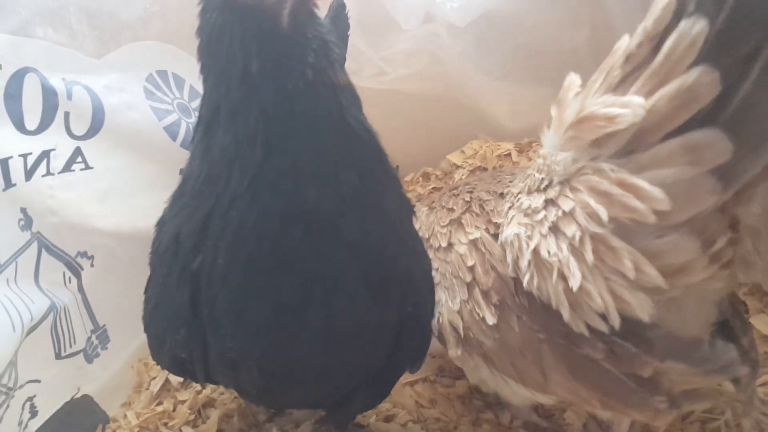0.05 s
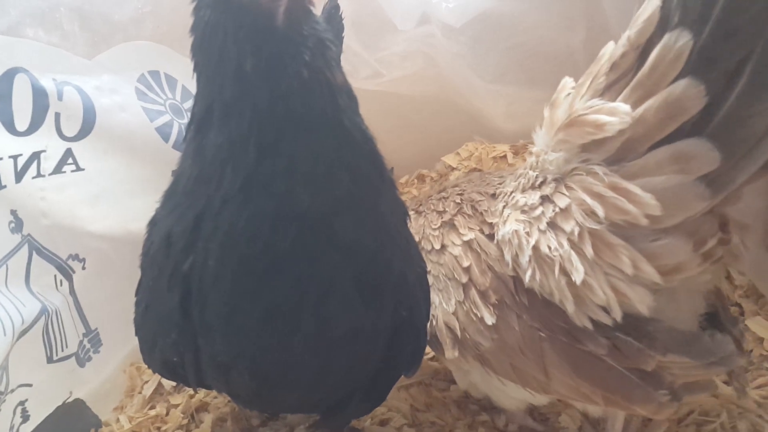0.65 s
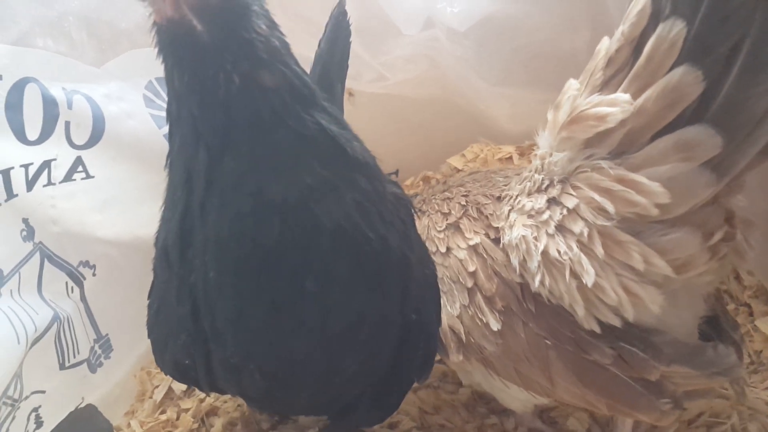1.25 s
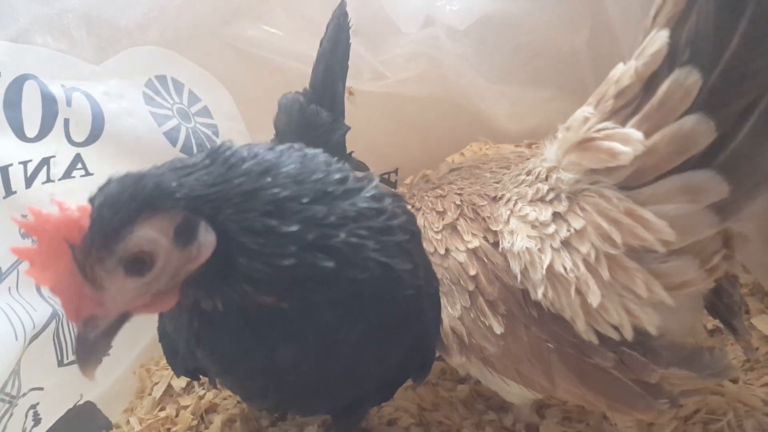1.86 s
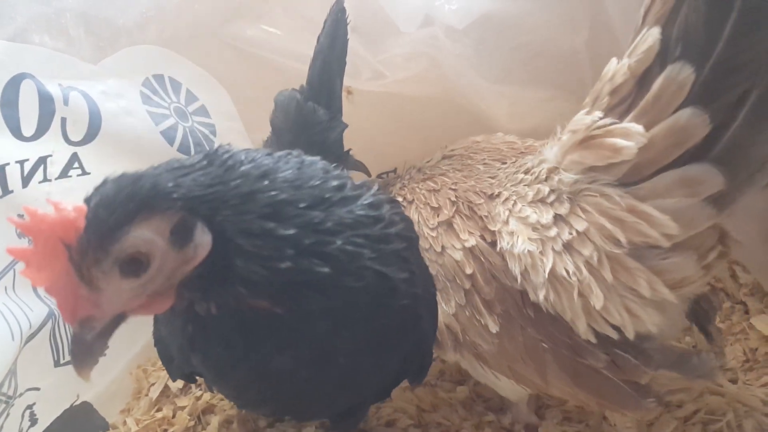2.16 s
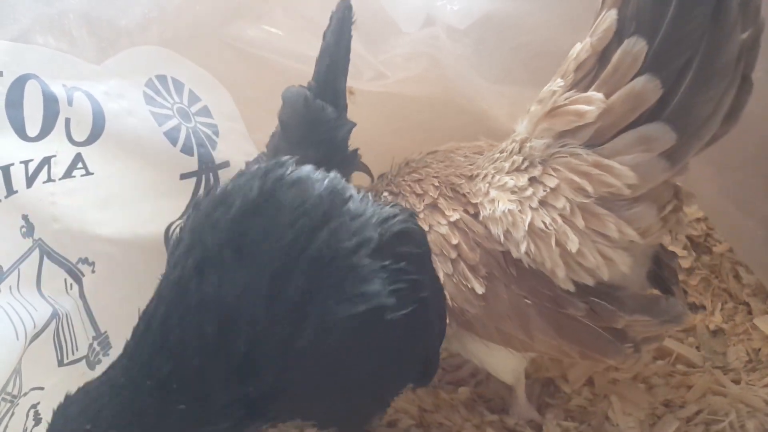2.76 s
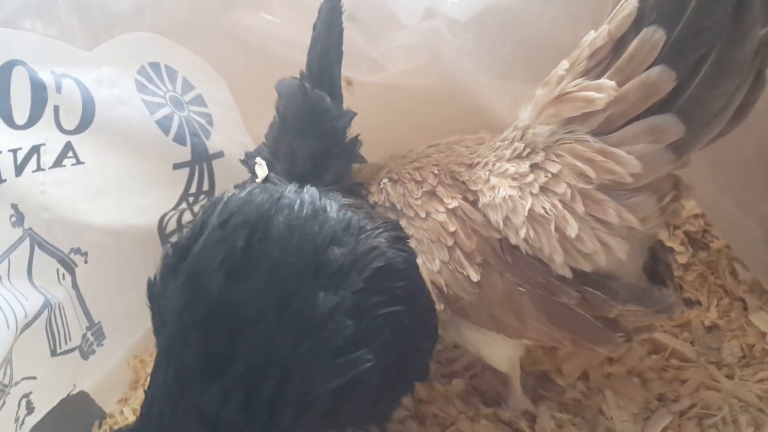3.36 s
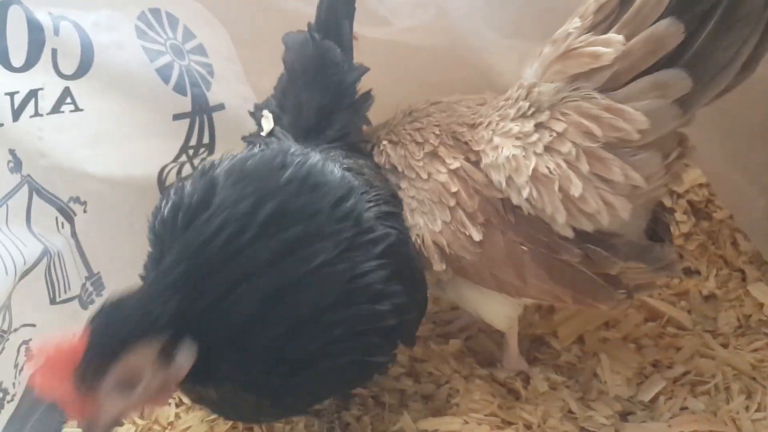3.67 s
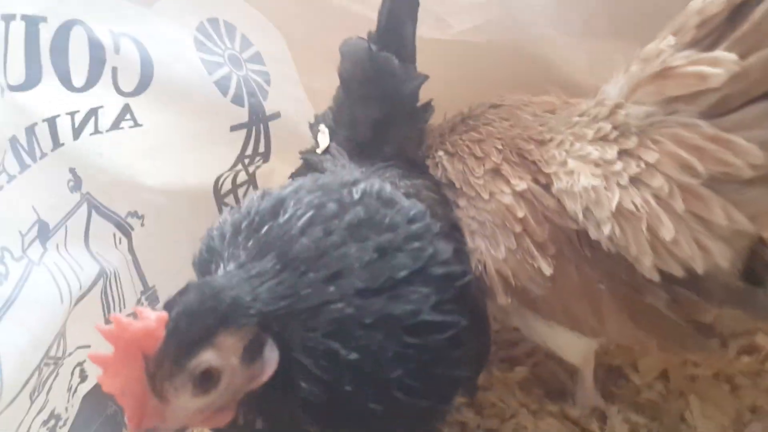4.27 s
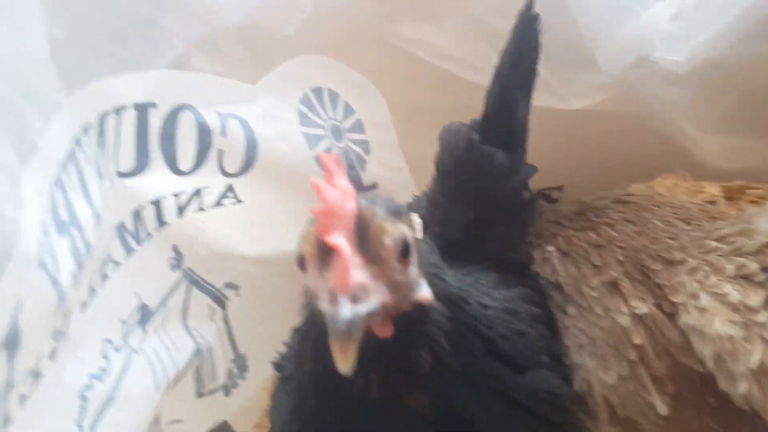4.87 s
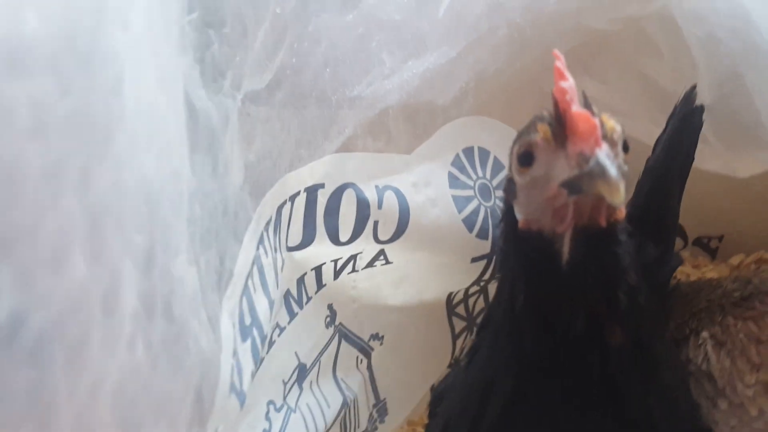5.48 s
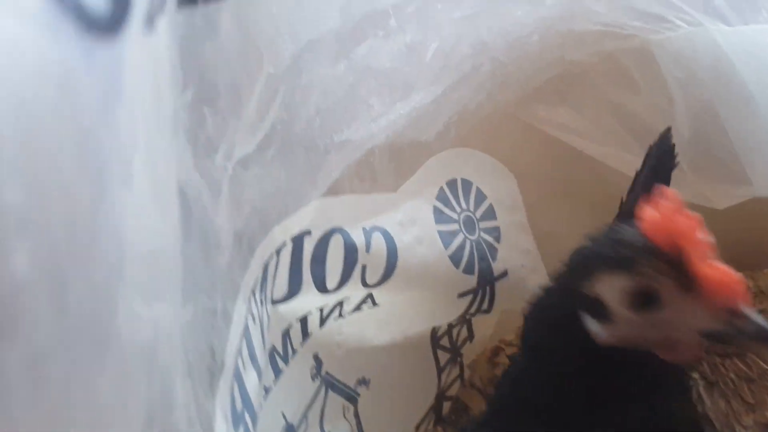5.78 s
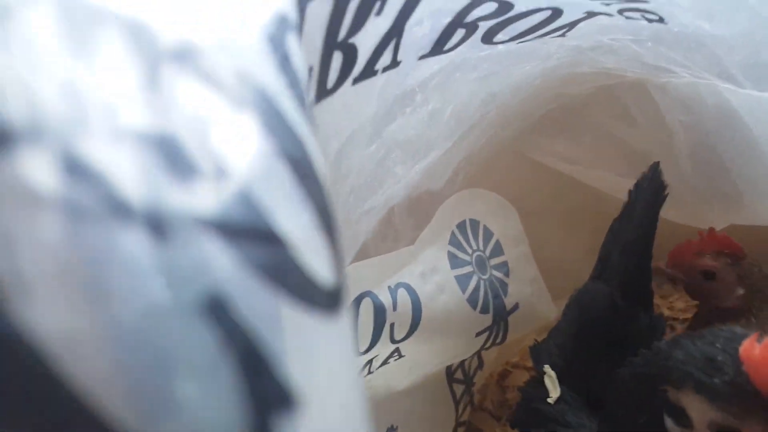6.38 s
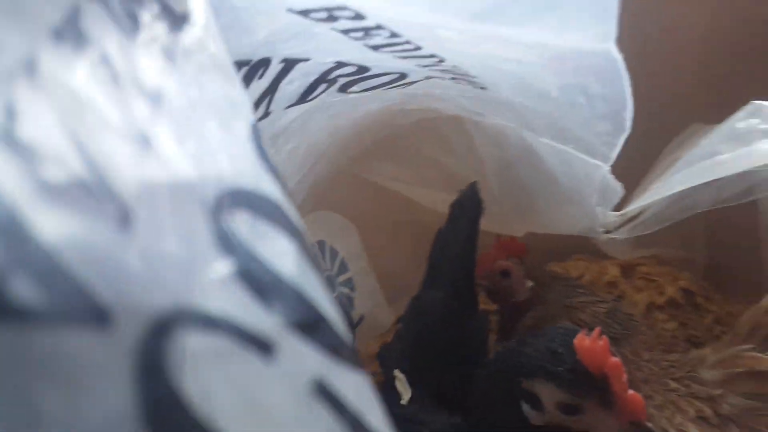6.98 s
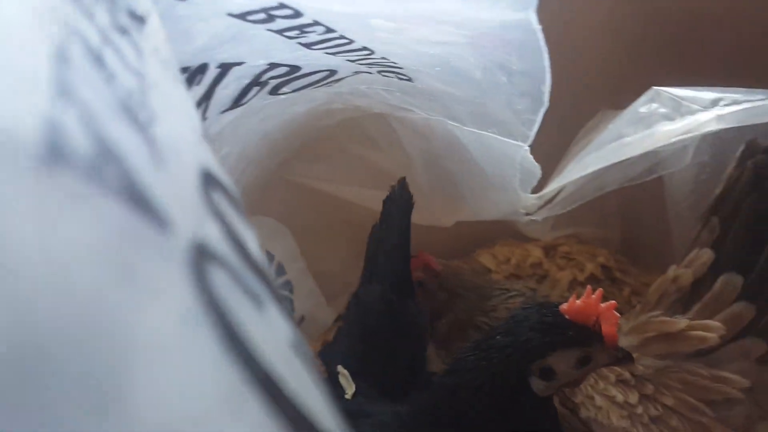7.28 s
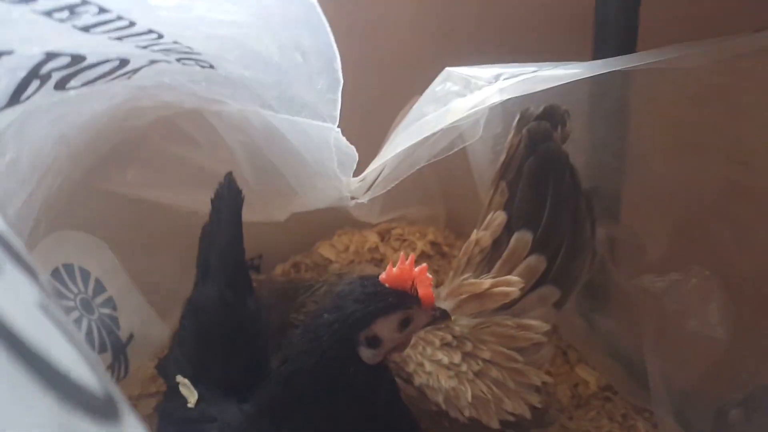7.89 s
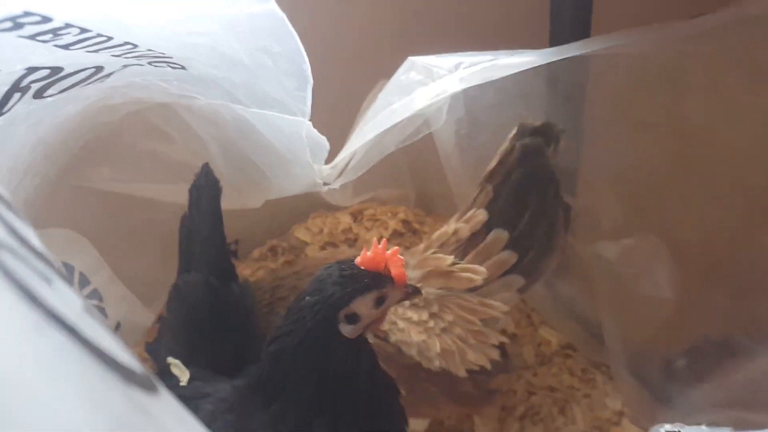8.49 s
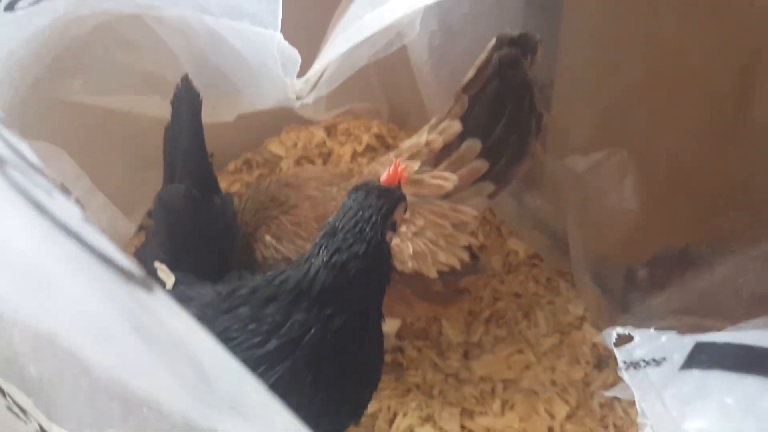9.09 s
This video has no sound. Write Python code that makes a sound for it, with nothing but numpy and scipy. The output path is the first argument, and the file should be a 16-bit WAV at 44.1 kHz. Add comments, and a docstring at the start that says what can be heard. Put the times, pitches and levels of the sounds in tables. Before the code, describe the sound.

For the first 3 seconds, dry wood shavings crackle and tick faintly as two small hens shift their feet. Close by, fingers rub and softly bump the hand-held microphone over a low, steady room hiss. From about 3.2 to 4.3 seconds a finger drags across the device with a low rumble and several dull thumps, strongest near 3.5, while a hen scratches in the shavings. Scattered steps and bumps follow, with one crisp snap of a shaving near 4.9. From 5.8 seconds a plastic bag slides along the device, crinkling, hissing and knocking, mostly on the left and strongest around 6.9. Short scrapes and ticks follow. Near 7.7 a fold scrapes on the right, falling in pitch, and just after 7.8 the bag's edge snaps twice in quick succession, the loudest sounds. The plastic then settles with a soft rustle, and the hens stir faintly around 8.5 seconds.

```python
"""Two small hens shift in wood shavings in a plastic bag, heard from a hand-held device in a quiet room.
At first the shavings crackle faintly while fingers rub and bump the case (stick-slip friction, impact).
Past 3 s a finger drags across it and a hen scratches. From about 5.8 s the bag slides along the case and
its film scrapes over the left and right microphone ports. Near 7.8 s its edge snaps twice against the
right port and rings in damped modes; last, the bag relaxes and the hens stir again."""
import sys
import numpy as np
from scipy import signal
from scipy.fft import rfft, irfft
from scipy.io import wavfile

SR = 44100
rng = np.random.default_rng(int(sys.argv[2]) if len(sys.argv) > 2 else 0)


def wav_record(signal):
    """Record a signal, one row per channel, as 16-bit PCM in the file named by sys.argv[1]."""
    frames = np.transpose(np.atleast_2d(signal))
    bounded = np.clip(frames, -1, 1)
    # unit amplitude maps onto the largest positive 16-bit level
    quanta = np.round(bounded * 32767).astype(np.int16)
    wavfile.write(sys.argv[1], SR, quanta)


N = 407836
TIME = np.arange(N) / SR

# Levels are relative within each table; pan is the left level minus the right.
# Spectra of the room noise and of the dry flakes: (frequency [Hz], gain [dB])
ROOM_SPECTRUM = [(15, -37), (30, -16), (50, -12), (85, -10.5), (116, -8.5), (165, -13), (310, -17.5),
                 (380, -16), (1030, -27), (2750, -29), (4540, -35.5), (6540, -36.5), (9400, -41.5),
                 (14700, -36), (16000, -38.5)]
FLAKE_SPECTRUM = [(1650, -14.5), (2800, -6.5), (3460, -6.5), (4270, -7), (4980, -7), (6570, -6.5),
                  (7720, -9.5), (9530, -23.5), (13800, -17), (15200, -26), (16000, -14.5)]
# Spectra of friction on the case, low to high: (frequency [Hz], gain [dB])
RUMBLE_SPECTRUM = [(20, -50.5), (40, -4.5), (62, -12), (95, -1), (170, -1), (250, -1), (310, -6.5),
                   (420, -19), (700, -69.5)]
RUB_SPECTRUM = [(120, -23), (230, -9), (320, 1), (420, -5), (560, -2), (720, -10), (900, -12),
                (1300, -28.5), (2200, -64)]
SCUFF_SPECTRUM = [(350, -14), (600, -13), (644, -2.5), (1420, -5), (2290, -7), (3240, -14.5), (3570, -19),
                  (5000, -27.5), (6500, -59), (11000, -120)]
# Spectra of the bag's crinkle, its hiss and its film on a port: (frequency [Hz], gain [dB])
CRINKLE_SPECTRUM = [(290, -18.5), (500, 4.5), (560, -4), (800, -2.5), (1050, -3), (1370, -3.5),
                    (1580, -7.5), (1840, -3.5), (4000, -15), (5200, -47.5), (8800, -120)]
HISS_SPECTRUM = [(1470, -34), (2500, -7.5), (3180, -8), (3920, -10), (4340, -7.5), (4730, -8.5),
                 (6010, -7.5), (6760, -5.5), (9290, -25.5), (15000, -25), (16000, -17)]
FILM_SPECTRUM = [(120,-23.5), (350,-8.5), (550,-6.5), (900,-10), (1250,-3), (1770,-1), (3100,-4.5),
                 (4300,-7.5), (6900,-7.5), (8200,-18), (9630,-27), (12900,-20), (16000,-28)]

# A hen shifts a foot: (start [s], duration [s], level [dB])
HEN_STEPS = [(0.025,0.036,-86), (0.153,0.024,-63), (0.206,0.088,-76), (0.343,0.057,-68), (0.5,.04,-77),
             (.76,.02,-69.5), (0.847,.025,-73), (0.937,0.099,-71.5), (1.174,0.26,-81), (1.437,0.17,-73),
             (1.843,0.035,-68), (2.175,0.36,-73), (2.567,0.34,-77.5), (2.943,0.051,-61), (3.006,0.22,-70),
             (3.495,0.025,-52), (3.544,.015,-56), (4.248,0.028,-59.5), (4.3,0.013,-64.5),
             (4.368,0.074,-72.5), (4.453,.035,-67), (4.613,0.029,-64), (4.685,0.017,-57), (4.72,.025,-66),
             (4.99,0.098,-73.5), (5.254,0.022,-78), (5.366,.06,-75.5), (5.456,0.016,-65.5), (8.28,.04,-87),
             (8.509,0.026,-69), (8.554,0.037,-59.5), (8.615,.11,-71), (9.089,.02,-69.5)]
# A spell of scratching: (time [s], level [dB])
HEN_SCRATCHING = [(3.24,-68), (3.46,-62.5), (3.68,-66), (3.8,-56.5), (4.06,-58.5), (4.15,-65.5), (4.35,-75)]
# Single shavings snap: (time [s], level [dB], resonance [Hz], tilt [dB/octave], pan [dB])
FLAKE_SNAPS = [(0.0282,-59.5,3100,5,6), (0.158,-51,6810,-6,-6), (0.2073,-56,2850,4,2),
               (0.642,-54.5,7240,7.5,0), (0.9564,-63,2940,-3,1), (1.5,-47,6500,15.5,-4),
               (2.172,-52,5500,11.5,1), (1.2315,-60.5,2500,0,3), (1.8246,-52.5,2830,4.5,0),
               (1.8584,-39,6400,14,-8), (1.869,-48,2890,6,2), (1.995,-58,6000,7,-5), (2.184,-60,6000,11,-2),
               (2.579,-55,2780,5.5,-1), (2.671,-49,3200,-5,11), (2.7396,-58.5,5500,4,-1),
               (2.972,-43,6500,13,-6), (2.981,-46,6500,13,-4), (3.386,-54.5,3600,-5,10),
               (3.4016,-44,3590,-7,7), (3.424,-44.5,3600,-5.5,8), (3.4605,-43,3600,-5,7),
               (3.498,-40.5,3690,-4,21), (3.5527,-40,3660,-3,9), (4.352,-49,7400,6,3), (4.433,-58,2930,1,8),
               (4.5527,-51,2870,7.5,3), (4.582,-58,2730,2,6), (4.695,-47.5,2300,-6,-1),
               (4.9038,-32,6400,11.5,2.5), (5.0788,-53,3600,-17,1), (5.2824,-58,6600,5,8),
               (5.4779,-50,3520,-3.5,1), (8.5151,-50,3700,-6,-2), (8.5609,-50,6590,9,-6)]

# The hand at rest: (rumble [dB], rub [dB], scuff [dB])
RESTING_HAND = [-70, -85.5, -79]
# A fingertip creeps: (start [s], duration [s], rumble [dB], rub [dB], scuff [dB], pan [dB])
FINGER_CREEPS = [(0.015,0.1,-65.5,-72,-86,-5), (0.134,.06,-56.5,-60.5,-62,-2), (0.23,0.088,-50,-56,-64.5,1),
                 (0.34,0.058,-46,-48,-58.5,-1.5), (0.502,0.041,-55,-58,-71,-3),
                 (0.612,0.025,-57,-72,-88,-6), (0.712,0.083,-52.5,-61,-70.5,-5),
                 (0.861,.03,-52.5,-56.5,-76,2), (0.949,0.066,-45.5,-52,-64,7),
                 (1.073,0.031,-57.5,-64.5,-76,-5), (1.161,0.062,-56,-63.5,-71.5,4),
                 (1.25,0.09,-60,-68,-72.5,1), (1.333,0.03,-64,-64,-81,-2), (1.446,.05,-67,-66,-73,-4),
                 (1.488,0.016,-51.5,-56.5,-71,7), (1.549,0.11,-63,-69,-79,0),
                 (1.83,0.048,-57.5,-62.5,-68.5,3), (2.165,0.062,-64,-69,-76,1), (2.247,.05,-60,-68,-73,-1),
                 (2.401,0.018,-55.5,-70,-73,-1), (2.504,0.012,-48.5,-59,-80,22),
                 (2.578,0.019,-56.5,-62,-71,-4), (2.668,.05,-56.5,-72,-72,2), (2.853,0.041,-46.5,-52,-69,6),
                 (2.904,0.02,-43.5,-49,-73,21), (2.952,0.048,-49,-58,-59.5,-3),
                 (3.045,0.076,-52.5,-61,-71,-1), (3.144,0.083,-44,-54,-64,9), (3.489,0.027,-49,-47,-46,16),
                 (3.978,0.02,-61,-45.5,-44.5,-19), (4.065,0.015,-57,-39,-54.5,-16),
                 (4.261,.015,-51,-59,-53,10), (4.382,0.062,-60,-73,-72,9), (4.458,0.047,-54,-65,-64,0.5),
                 (4.605,0.047,-51.5,-62.5,-62,3), (4.681,0.02,-45,-59,-61,13), (4.718,0.02,-59,-67,-58,-2),
                 (5.075,0.024,-67,-80,-81,6), (5.264,0.072,-66,-85,-77.5,9), (5.375,0.12,-68,-75,-72,5),
                 (5.544,0.021,-49.5,-61,-72,6), (6.169,0.16,-45,-49,-58,13), (6.834,0.0094,-48,-36,-41,25),
                 (7.225,0.04,-53,-63,-74,24), (7.349,0.048,-59,-66,-70,22)]
# One long drag of a finger: (time [s], rumble [dB], rub [dB], scuff [dB], pan [dB])
FINGER_DRAG = [(3.24,-50,-73,-67,3), (3.3,-49,-46,-57,6.5), (3.45,-38.5,-47.5,-57.5,11.5),
               (3.56,-42.5,-40.5,-52.5,-1), (3.63,-54,-49.5,-60,-4.5), (3.79,-46.5,-46.5,-52.5,-10),
               (3.9,-48.5,-44,-50,-23), (4.0,-55,-48.5,-48.5,-13), (4.08,-61,-55,-66,-11),
               (4.15,-59,-54.5,-60.5,-3.5), (4.28,-61,-73,-56,0), (4.35,-64,-71,-76,0)]
# Soft bumps on the case: (time [s], level [dB], frequency [Hz], rise [s], t60 [s], pan [dB])
CASE_BUMPS = [(0.252,-42.5,185,0.0011,.055,0), (0.399,-35.5,172,.001,0.059,10),
              (.88,-46,159,0.0011,0.077,4), (.981,-45,177,.002,.046,6), (1.506,-39.5,198,.002,0.034,20),
              (1.87,-44,109,0.00087,0.039,2), (2.512,-38.5,211,0.0014,0.029,23),
              (2.667,-43,126,.001,0.068,12), (2.861,-39,226,0.0011,0.032,9),
              (2.907,-27.5,202,0.0014,0.042,15), (2.935,-38,172,.002,0.063,15),
              (3.155,-35,185,0.0023,0.035,10), (3.328,-35.5,182.5,0.0017,0.18,17),
              (3.461,-26,182,0.0014,0.098,17), (3.502,-30,265,0.0017,0.047,14),
              (3.527,-26,242,0.0032,0.043,8), (3.554,-19.5,180,0.0015,0.021,3),
              (4.47,-49,171,0.0044,0.058,12), (4.611,-46.5,221,0.0036,0.12,4.5),
              (4.637,-46,117,.003,.055,5), (4.677,-36.5,95.5,.005,0.097,19), (4.695,-29,209,0.021,0.055,11),
              (5.55,-44,102,0.002,0.1,7), (5.808,-37.5,124,0.00091,0.046,17),
              (5.957,-25,172,0.0033,0.039,-13), (6.01,-34,156,0.001,0.044,-17),
              (6.172,-30.5,130,0.0007,0.022,7), (6.274,-33,137,0.0039,0.095,23),
              (7.347,-46.5,117.7,0.0012,0.21,19), (7.697,-51.5,168,0.0031,0.078,-20),
              (7.832,-35,172,0.00074,0.12,2)]
# Skin or film catches: (time [s], level [dB], frequency [Hz], pan [dB])
SURFACE_CATCHES = [(0.252, -52, 616, -1.0), (0.398, -45, 690, -7), (0.88, -39.5, 493, 13),
                   (0.957, -43, 533, 6), (1.091, -45, 720, -14), (1.869, -49, 1390, 3),
                   (2.512, -44, 623, 1), (2.668, -51.5, 544, 16), (2.862, -41, 567, 0),
                   (2.885, -35, 607, 3.5), (2.906, -40, 470, 9), (3.057, -45.5, 660, 11),
                   (3.18, -39.5, 547, 9), (3.295, -39.5, 666, 11), (3.423, -39, 600, 2),
                   (3.458, -33, 494, 5), (3.503, -33, 534, -2), (3.552, -52, 570, -6),
                   (3.776, -34.5, 855, -21), (3.875, -31, 420, -29), (4.084, -31.5, 700, -18),
                   (4.903, -46.5, 980, -5), (5.71, -50, 960, 0), (5.807, -44, 580, 11),
                   (5.958, -39.5, 780, -8), (6.498, -28.5, 1080, 17), (6.89, -29.5, 626, 27),
                   (6.895, -19.5, 856, 16), (6.946, -24.5, 2570, 18)]

# The bag slides along the case: (time [s], rumble [dB], crinkle [dB], hiss [dB], pan [dB])
BAG_SLIDE = [(5.81,-61,-51.5,-61.5,13), (5.98,-51,-55.5,-61,9), (6.12,-55.5,-57,-73,7),
             (6.26,-51,-46.5,-56,13), (6.345,-55,-51.5,-62,4), (6.385,-54,-62.5,-59,5.5),
             (6.55,-56.5,-51,-55.5,6), (6.67,-57.5,-44,-49,-3), (6.78,-48.5,-41,-46.5,6.5),
             (6.9,-49.5,-39.5,-56.5,5.5), (6.935,-51.5,-53,-39,20), (6.99,-57.5,-57,-69,4),
             (7.06,-67,-50.5,-50,7), (7.095,-71,-61,-41,1), (7.21,-66,-45.5,-57.5,33)]
# The bag relaxes: (time [s], level [dB])
BAG_SETTLE = [(7.33,-69.5), (7.39,-63.5), (7.56,-61.5), (7.78,-61.5), (7.89,-55), (8.02,-68.5), (8.3,-67.5),
              (8.8,-75.5)]
# Short scrapes over a port:
# (start [s], end [s], level [dB], tilt [dB/octave], resonance [Hz], resonance gain [ratio], pan [dB])
FILM_SCRAPES = [(5.708,5.729,-59.5,-7,1300,2.1,9), (5.809,5.837,-52.5,-5,3790,1.2,10),
                (6.333,6.361,-49,-2.5,2840,0.85,18), (6.667,6.683,-40.5,1.5,2140,2.1,-25),
                (6.937,6.968,-41,2.5,2700,13,29), (6.919,6.933,-41,-2,4800,9.8,23),
                (6.967,7.07,-56.5,5.5,2770,5.8,16), (7.083,7.1,-36,1,6630,4.3,16),
                (7.104,7.159,-45,-0.5,2340,0.45,4), (7.15,7.167,-40,0,3200,1.1,1),
                (7.182,7.196,-42,0,7140,3.2,11), (7.197,7.217,-50,-3,6600,1.2,12),
                (7.226,7.238,-46,-2.5,5850,3,15), (7.245,7.257,-51,-1,6540,1.3,14),
                (7.348,7.382,-59,-3,1830,0.58,16), (7.504,7.533,-52,-3.5,1400,1.9,10),
                (7.83,7.841,-38.5,-4,1550,1.08,-20), (7.842,7.878,-41,-4,1660,1,-14),
                (7.881,7.903,-44.5,-5.5,1650,0.91,-18), (7.951,7.983,-56.5,-5,1640,4.7,-23),
                (7.945,8.006,-65,-3.5,4200,4,-16)]
# Single slips of the film: (time [s], peak level [dB], resonance [Hz], pan [dB])
FILM_SLIPS = [(7.346,-40.5,3000,18), (7.373,-53,3000,9), (7.504,-43,1620,9), (7.611,-37,1900,-25),
              (7.62,-36.5,1690,-27.5), (7.623,-35,1800,-18.5), (7.629,-33,1800,-23.5), (7.637,-32,2400,-25),
              (7.842,-24,2280,-31), (7.857,-37.5,1700,-30), (7.867,-22,1600,-24)]
# A slackening fold scrapes the right port: (time [s], level [dB], resonance [Hz])
FOLD_SWEEP = [(7.641,-45,5400), (7.647,-39.5,5200), (7.665,-35.5,4600), (7.685,-35.5,3300),
              (7.701,-28,2600), (7.708,-38.5,2100), (7.73,-36.5,2250), (7.736,-44,2300), (7.739,-51,2300)]
# The bag's edge strikes the right port: (time [s], level [dB], pan [dB])
EDGE_TAPS = [(7.8337, -12.5, -27), (7.8772, -13.5, -28)]
# Normal modes of that edge: (frequency [Hz], level [dB], t60 [s])
TAUT_EDGE_MODES = [(900, -19, 0.0026), (1410, -7, 0.0059), (1574, -7.5, 0.02), (2160, -17, 0.018),
                   (3750, -6.5, 0.0026), (4270, -28, 0.039), (5900, -18, 0.0037)]


def from_db(db):
    """Logarithmic level: 20 dB is a factor of ten in amplitude."""
    return 10 ** (np.asarray(db) / 20)


def rms_one(x):
    """Normalisation to unit mean power."""
    return x / np.sqrt(np.mean(x ** 2) + 1e-20)


def in_time(rows):
    """Linear interpolation of each column of a curve at every sample."""
    times, *columns = np.transpose(rows)
    return [np.interp(TIME, times, column) for column in columns]


def during(start, end, fade, t=TIME):
    """Trapezoidal window: 1 between start and end, with sloping edges."""
    return np.clip(np.minimum(t - start, end - t) / fade + .5, 0, 1)


def stroke(start, length, attack_s, t60):
    """Envelope of one movement: linear rise, hold, exponential decay."""
    gain = np.zeros(N)
    at = int(max(start - attack_s, 0) * SR)
    t = TIME[at:at + SR] - start
    gain[at:at + SR] = np.clip(t / attack_s + .5, 0, 1) * from_db(-60 * np.maximum(t - length, 0) / t60)
    return gain


def ports(pan_db):
    """Constant-power panning: the mean of two uncorrelated port signals keeps its level."""
    gains = from_db(np.array([[.5], [-.5]]) * pan_db)
    return 2 * gains / np.sqrt(np.sum(gains ** 2, axis=0))


def at_peak(sound, peak_db, pan_db):
    """Peak normalisation: a transient is panned, then scaled by the mean of the two ports."""
    sound = sound * ports(pan_db)
    return from_db(peak_db) * sound / np.abs(sound.mean(axis=0)).max()


def add(out, start, sound):
    """Superposition of a short sound, from a start in seconds."""
    at = int(start * SR)
    out[:, at:at + sound.shape[1]] += sound[:, :N - at]


def colour(x, spectrum, tilt_db=0, size=4096):
    """Minimum-phase filtering by a spectrum, tilted by tilt_db an octave."""
    hz, db = np.transpose(spectrum)
    octave = np.log2(np.maximum(np.fft.rfftfreq(size, 1 / SR), 1))
    magnitude = from_db(np.interp(octave, np.log2(hz), db) + tilt_db * (octave - 10))
    cepstrum = irfft(np.log(magnitude))
    cepstrum[1:size // 2] *= 2   # folding onto positive time makes the filter causal
    cepstrum[size // 2 + 1:] = 0
    impulse = irfft(np.exp(rfft(cepstrum)))
    return signal.fftconvolve(x, impulse[None], axes=1)[:, :x.shape[1]]


def resonate(x, hz, width_hz):
    """Second-order resonance with unit peak gain."""
    r = np.exp(-np.pi * width_hz / SR)
    poles = [1, -2 * r * np.cos(2 * np.pi * hz / SR), r * r]
    return signal.lfilter(np.array([1, 0, -1]) * (1 - r * r) / 2, poles, x)


def drift(rate, size):
    """Slow random modulation: lines joining unit Gaussian values, rate of them a second."""
    place = np.arange(size) * rate / SR
    return np.interp(place, np.arange(4096), rng.standard_normal(4096))


def friction(per_s, spread_db, clump_db, shared, size=N):
    """Stick-slip as shot noise: uneven impulses in clumps, part of their power common to both ports."""
    occurs = rng.random((3, size)) < per_s / SR
    slips = occurs * rng.standard_normal((3, size))
    slips *= from_db(spread_db * np.minimum(rng.exponential(1, (3, size)), 4))
    at_ports = np.sqrt(1 - shared) * slips[:2] + np.sqrt(shared) * slips[2]
    return at_ports * from_db(clump_db * drift(110, size))


def hollow(x, delay_ms, wander, depth, rate=9):
    """Comb filtering by two reflections in the changing gap between case and cover, at unit rms."""
    now = np.arange(x.shape[1])
    out = x.copy()
    for side in range(2):
        lag = delay_ms * SR / 1000 * np.exp(wander * drift(rate, len(now)))
        for bounce in (1, 2):
            out[side] += (-depth) ** bounce * np.interp(now - bounce * lag, now, x[side], left=0)
    return rms_one(out)


def room_noise(hiss_db=-66.5, drone_db=-74.5):
    """Stationary noise: a broad band, incoherent between the ports, and a coherent low drone."""
    hiss = rms_one(colour(rng.standard_normal((2, N)), ROOM_SPECTRUM))
    drone = rms_one(resonate(resonate(rng.standard_normal(N), 104, 50), 104, 50))
    return from_db(hiss_db) * hiss + from_db(drone_db) * drone


def reverberation(x, t60=0.2, wet_db=-24):
    """Diffuse reflection from nearby walls leaves a faint, exponentially decaying tail."""
    t = TIME[:SR // 2]
    tail = rng.standard_normal((2, len(t))) * from_db(-60 * t / t60) * (t > .006)
    tail = signal.lfilter([.4], [1, -.6], tail)   # softens the treble
    tail /= np.sqrt(np.sum(tail ** 2, axis=1, keepdims=True))
    return from_db(wet_db) * signal.fftconvolve(x, tail, axes=1)[:, :N]


def shavings():
    """Acoustic emission of dry flakes: ticks at a hen's light touch, rustle under weight, lone snaps."""
    scratch_db, = in_time(HEN_SCRATCHING)
    scratching = from_db(scratch_db) * during(HEN_SCRATCHING[0][0], HEN_SCRATCHING[-1][0], 0.018)
    power = sum((from_db(db) * stroke(start, length, attack_s=0.02, t60=0.067)) ** 2
                for start, length, db in HEN_STEPS)
    power += scratching ** 2 + from_db(-91.5) ** 2   # the floor: litter under standing hens
    crackle_db = 10 * np.log10(power)
    dense = friction(per_s=2000, spread_db=2, clump_db=1.5, shared=0.15)
    sparse = friction(per_s=540, spread_db=4, clump_db=6.5, shared=0.24)
    rustle = rms_one(colour(dense, FLAKE_SPECTRUM, tilt_db=-0.7))
    ticks = rms_one(colour(sparse, FLAKE_SPECTRUM, tilt_db=7))
    out = rustle * from_db(crackle_db) + ticks * from_db(0.4 * crackle_db - 44.5)
    t = TIME[:SR // 20]
    decay = from_db(-60 * t / 0.015) + from_db(-25 - 60 * t / 0.017)
    for start, db, hz, tilt_db, pan_db in FLAKE_SNAPS:
        crack = colour(rng.standard_normal((2, len(t))) * decay, FLAKE_SPECTRUM, tilt_db)
        add(out, start, at_peak(crack + 1.2 * resonate(crack, hz, 1100), db + 4, pan_db))
    return out


def fingers(let_go_s=7.45):
    """Stick-slip of skin on the case: slow slips rumble in its body, faster ones rub and scuff on top."""
    slow = friction(per_s=2500, spread_db=-1, clump_db=1, shared=0.095)
    rumble = rms_one(colour(slow, RUMBLE_SPECTRUM))
    faster = friction(per_s=3000, spread_db=-0.4, clump_db=4.5, shared=0.23)
    rub = hollow(colour(faster, RUB_SPECTRUM), delay_ms=3.685, wander=0.14, depth=0.38)
    fastest = friction(per_s=6000, spread_db=2.5, clump_db=4, shared=0.07)
    scuff = hollow(colour(fastest, SCUFF_SPECTRUM), delay_ms=1.967, wander=0.15, depth=0.66)
    strokes = np.array([stroke(start, length, attack_s=0.027, t60=0.12)
                        for start, length, *_ in FINGER_CREEPS])
    *creep_db, creep_pan_db = np.transpose(FINGER_CREEPS)[2:]
    *drag_db, drag_pan_db = in_time(FINGER_DRAG)
    dragging = during(FINGER_DRAG[0][0], FINGER_DRAG[-1][0], 0.025)
    holding = during(-1, let_go_s, 0.05)
    out = 0
    # (sound, share of the finger's pan [ratio], lean to the left [dB])
    layers = [(rumble, 0.75, 3.5), (rub, 0.95, -1.5), (scuff, 0.7, 0.5)]
    for k, (sound, follow, lean_db) in enumerate(layers):
        creeps = (from_db(creep_db[k] - 2.5) * ports(follow * creep_pan_db + lean_db)) @ strokes
        drag = dragging * from_db(drag_db[k] - 1) * ports(follow * drag_pan_db + lean_db)
        rest = holding * from_db(RESTING_HAND[k])
        out = out + sound * np.sqrt(creeps ** 2 + drag ** 2 + rest ** 2)
    return out


def bumps(grit=0.096):
    """Damped free vibration: pressed and released by a fingertip, the case swings a few low cycles."""
    out, t = np.zeros((2, N)), TIME[:SR // 5]
    for start, db, hz, rise, t60, pan_db in CASE_BUMPS:
        swing = np.sin(2 * np.pi * hz * t + np.array([[0], [1.6]]))   # the ports differ in phase
        rough = rms_one(colour(rng.standard_normal((2, len(t))), RUMBLE_SPECTRUM, tilt_db=-0.5))
        envelope = (1 - np.exp(-t / rise)) * from_db(-60 * t / t60)
        add(out, start, at_peak((swing + grit * rough) * envelope, db - 0.5, pan_db))
    return out


def catches():
    """Static friction gives way: a surface jumps free with a hollow tick and a spray of grit."""
    out, t = np.zeros((2, N)), TIME[:SR // 15]
    decay = from_db(-60 * t / 0.013) + from_db(-18 - 60 * t / 0.047)
    lowpass = signal.butter(2, 5500, fs=SR, output="sos")
    for start, db, hz, pan_db in SURFACE_CATCHES:
        jolt = rng.standard_normal((2, len(t))) * decay
        knock = np.sin(2 * np.pi * hz * t + np.array([[0], [1.5]])) * from_db(-60 * t * hz / 8)
        tick = resonate(1.48 * jolt + knock, hz, 0.76 * hz)
        add(out, start, at_peak(signal.sosfilt(lowpass, tick), db, pan_db))
    return out


def bag_slide():
    """Sliding friction: the sheet rumbles, crinkles and hisses along the case, then relaxes, rustling."""
    rumble_db, crinkle_db, hiss_db, pan_db = in_time(BAG_SLIDE)
    settle_db, = in_time(BAG_SETTLE)
    rumble = friction(per_s=5300, spread_db=2.3, clump_db=3, shared=0.04)
    rumble = rms_one(colour(rumble, RUMBLE_SPECTRUM, tilt_db=3))
    crinkle = friction(per_s=4500, spread_db=3, clump_db=2.6, shared=0.029)
    crinkle = hollow(colour(crinkle, CRINKLE_SPECTRUM), delay_ms=2.2, wander=0.192, depth=0.37, rate=18)
    hiss = friction(per_s=16000, spread_db=4, clump_db=1.5, shared=0.029)
    hiss = hollow(colour(hiss, HISS_SPECTRUM), delay_ms=0.73, wander=0.24, depth=0.2, rate=25)
    sheet = rumble * from_db(rumble_db) + crinkle * from_db(crinkle_db - 2) + hiss * from_db(hiss_db - 1)
    settle = (crinkle + 0.37 * hiss) * from_db(settle_db - 3) * during(7.26, 8.8, 0.04)
    return sheet * during(5.81, 7.21, 0.008) * ports(pan_db) + settle * ports(-4.5)


def film_scrapes():
    """Friction-driven resonance: film chatters over a port and each fold rings at its own pitch."""
    out, t = np.zeros((2, N)), TIME[:SR // 8]
    for start, end, db, tilt_db, hz, strength, pan_db in FILM_SCRAPES:
        slips = friction(per_s=12000, spread_db=3, clump_db=2.5, shared=0.03, size=len(t))
        chatter = colour(slips, FILM_SPECTRUM, tilt_db + 1)
        ring = strength * resonate(chatter, hz, 390)
        scrape = hollow(chatter + ring, delay_ms=1.277, wander=0.19, depth=0.26)
        window = during(0.0015, end - start + 0.002, 0.0045, t)
        add(out, start - 0.001, scrape * window * from_db(db + 1.5) * ports(pan_db))
    return out


def film_slips():
    """Impulsive excitation: the film lets go in single dry ticks, each with one resonance."""
    out, t = np.zeros((2, N)), TIME[:SR // 30]
    for start, db, hz, pan_db in FILM_SLIPS:
        burst = rng.standard_normal((2, len(t))) * from_db(-60 * t / 0.014)
        tick = colour(burst, FILM_SPECTRUM, tilt_db=-2.5)
        add(out, start, at_peak(tick + 1.5 * resonate(tick, hz, 500), db, pan_db))
    return out


def fold_sweep(width_hz=1000, block=32):
    """Tension sets pitch: a fold scrapes the right port and its resonance falls as it slackens."""
    times, db, hz = np.transpose(FOLD_SWEEP)
    t = times[0] + TIME[:SR // 8]
    slips = friction(per_s=12000, spread_db=1.5, clump_db=-2.5, shared=0.025, size=len(t))
    chatter = colour(slips, FILM_SPECTRUM)
    ring, state = np.zeros_like(chatter), np.zeros((2, 2))
    r = np.exp(-np.pi * width_hz / SR)
    for i in range(0, len(t), block):
        poles = [1, -2 * r * np.cos(2 * np.pi * np.interp(t[i], times, hz) / SR), r * r]
        ring[:, i:i + block], state = signal.lfilter([1, 0, -1], poles, chatter[:, i:i + block], zi=state)
    scrape = 1.05 * rms_one(chatter) + 0.92 * rms_one(ring)
    scrape = hollow(scrape, delay_ms=1.47, wander=0.082, depth=0.13)
    envelope = from_db(np.interp(t, times, db)) * (t < times[-1])
    out = np.zeros((2, N))
    add(out, times[0], scrape * envelope * ports(-40))
    return out


def edge_taps():
    """Modal vibration: the taut edge flicks the right port and rings as a sum of damped sinusoids."""
    out, t = np.zeros((2, N)), TIME[:SR // 10]
    bandpass = signal.butter(2, [200, 7000], "band", fs=SR, output="sos")
    for start, db, pan_db in EDGE_TAPS:
        ring = sum(from_db(mode_db + rng.normal(0, 1) - 60 * t / t60) * np.sin(2 * np.pi * hz * t)
                   for hz, mode_db, t60 in TAUT_EDGE_MODES)
        add(out, start, signal.sosfilt(bandpass, ring) * from_db(db) * ports(pan_db))
    return out


def scene():
    """Superposition of the direct sounds, their reverberation and the room's steady noise."""
    handling = fingers() + bumps() + catches()
    bag = bag_slide() + film_scrapes() + film_slips() + fold_sweep() + edge_taps()
    direct = handling + bag + shavings()
    return direct + reverberation(direct) + room_noise()


def record(dry):
    """Band limiting: the deepest bass is removed, and the top is cut steeply."""
    highpass = signal.butter(2, 44, "high", fs=SR, output="sos")
    lowpass = signal.ellip(10, 0.2, 70, 15900, fs=SR, output="sos")
    return signal.sosfilt(lowpass, signal.sosfilt(highpass, dry))


dry = scene()
out = record(dry)
wav_record(out)
```